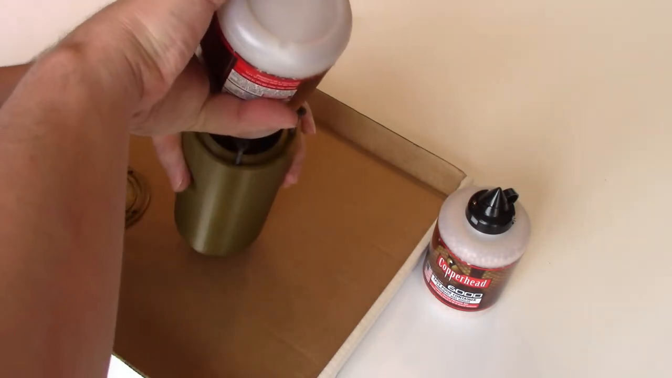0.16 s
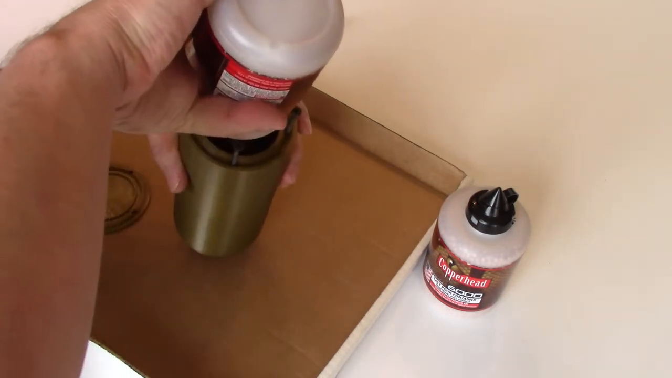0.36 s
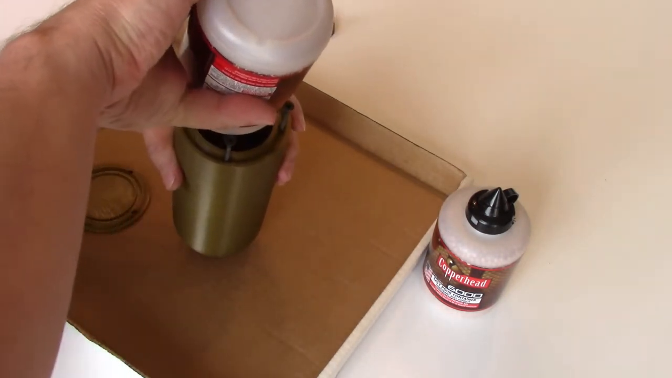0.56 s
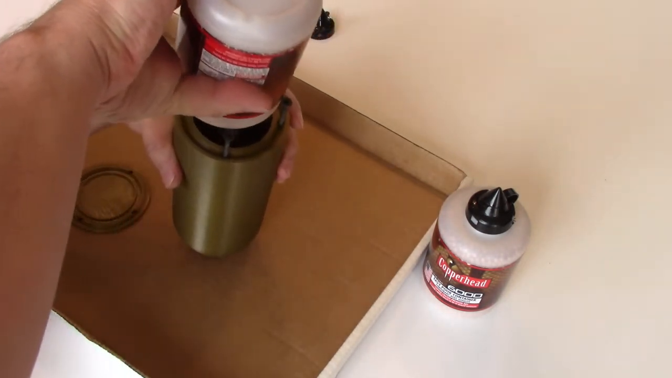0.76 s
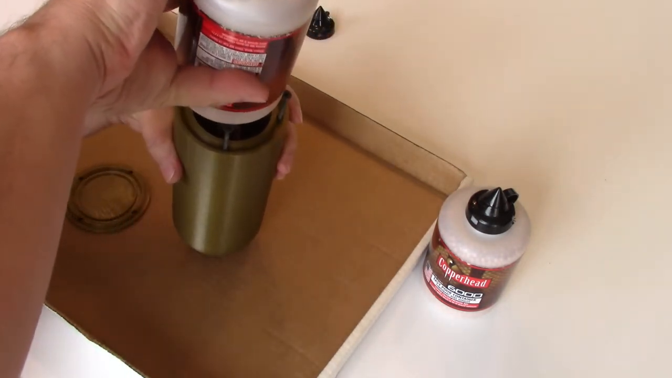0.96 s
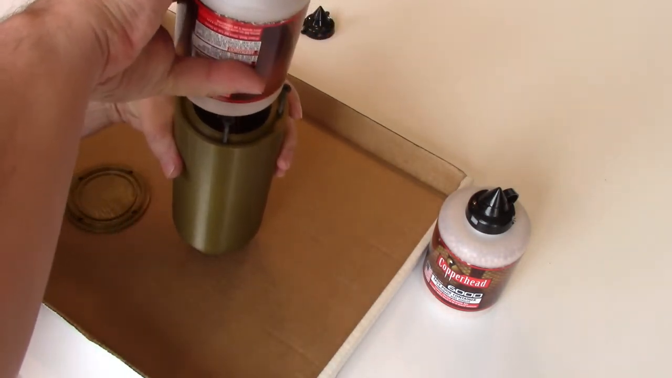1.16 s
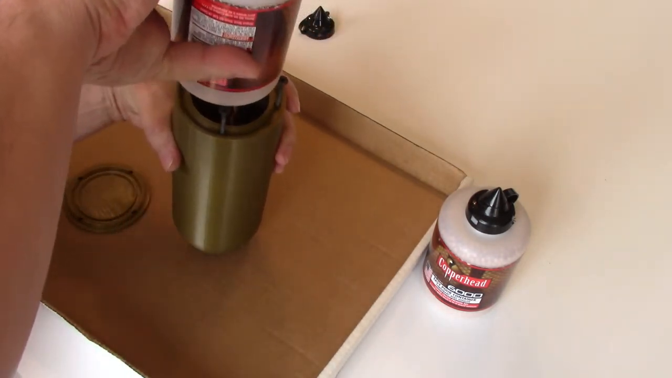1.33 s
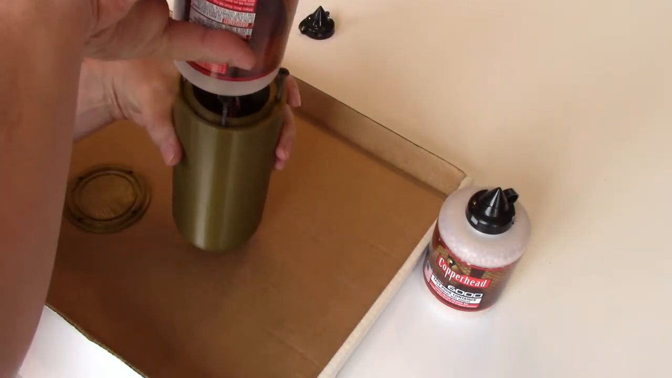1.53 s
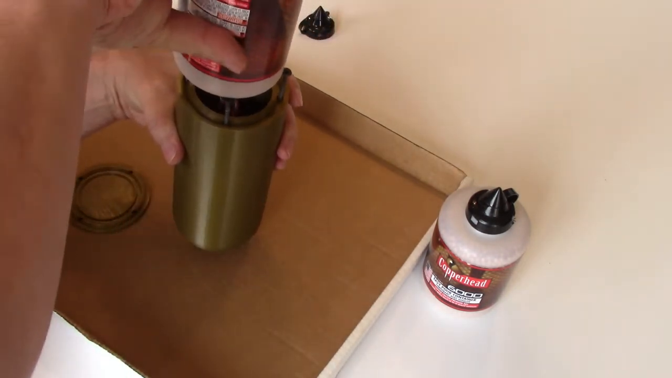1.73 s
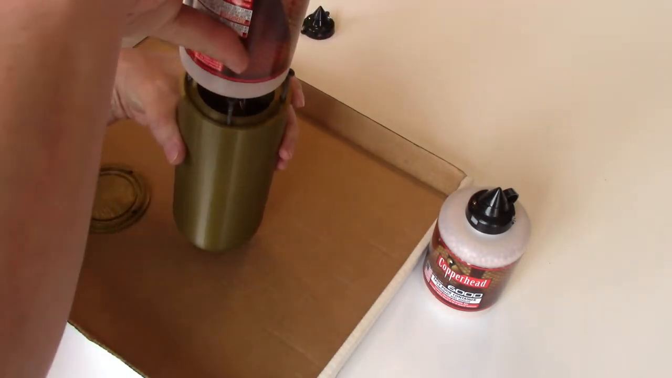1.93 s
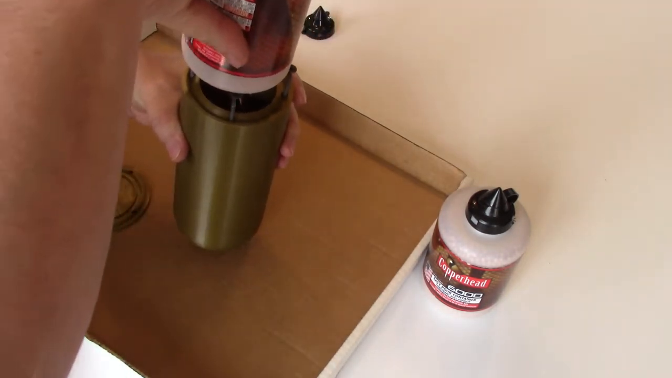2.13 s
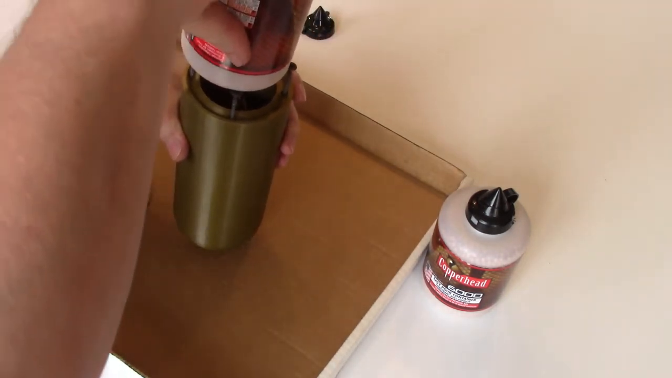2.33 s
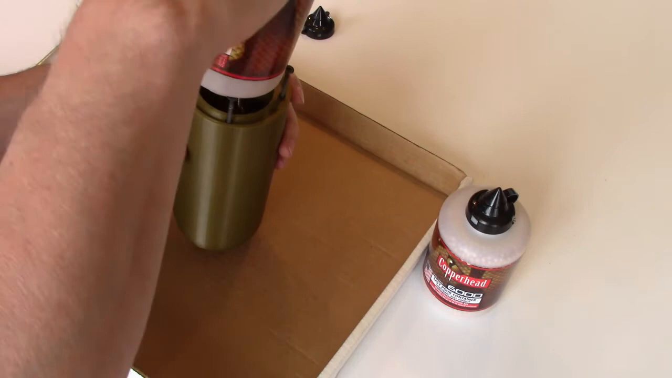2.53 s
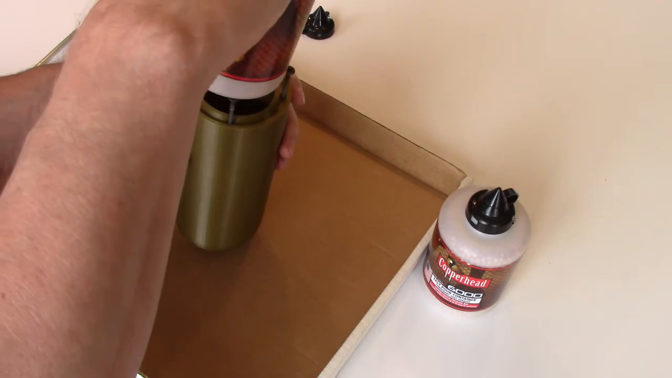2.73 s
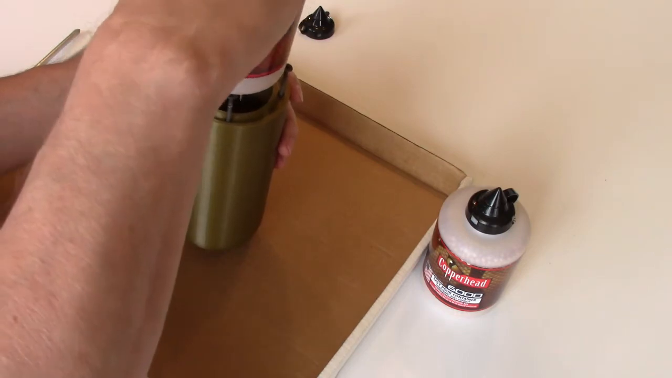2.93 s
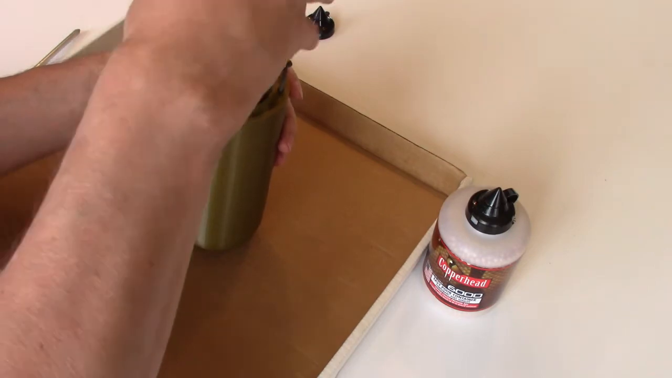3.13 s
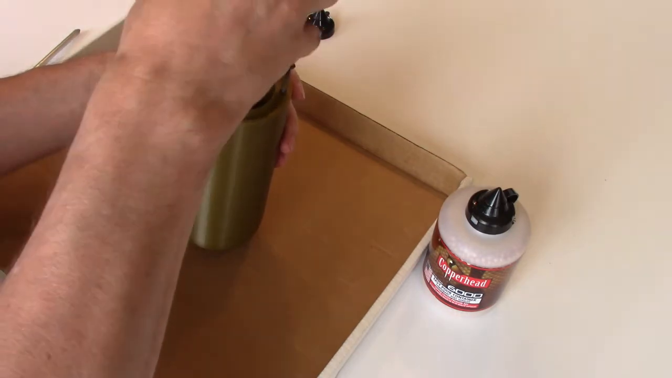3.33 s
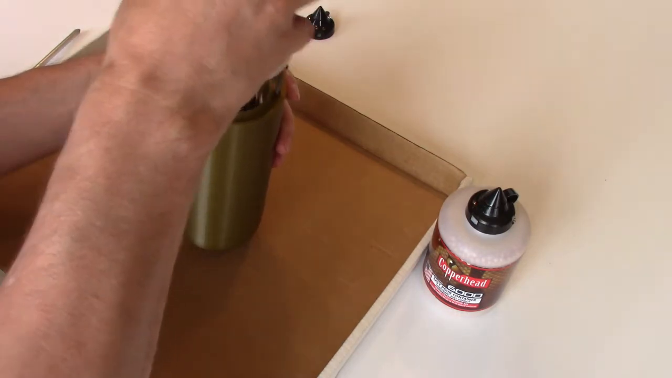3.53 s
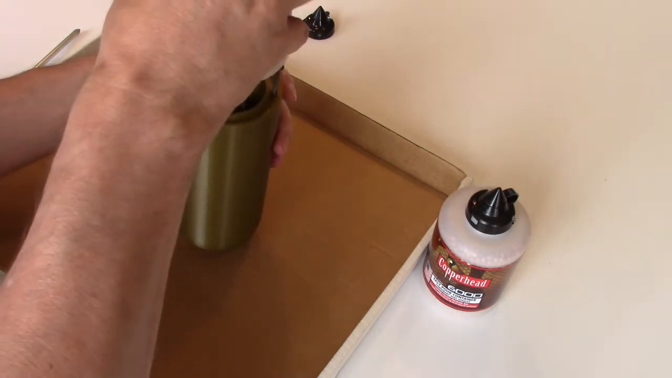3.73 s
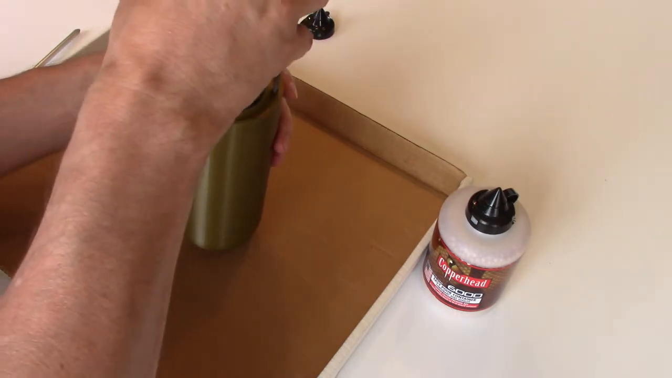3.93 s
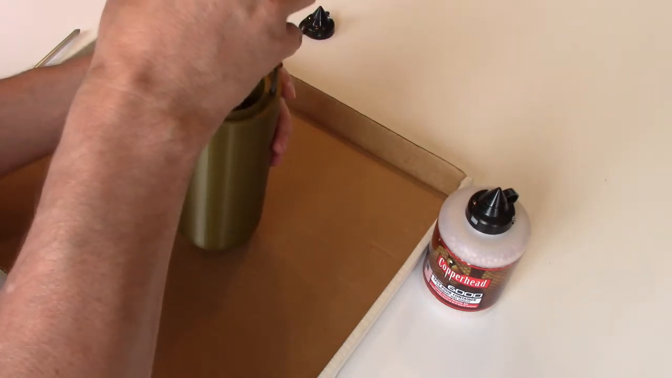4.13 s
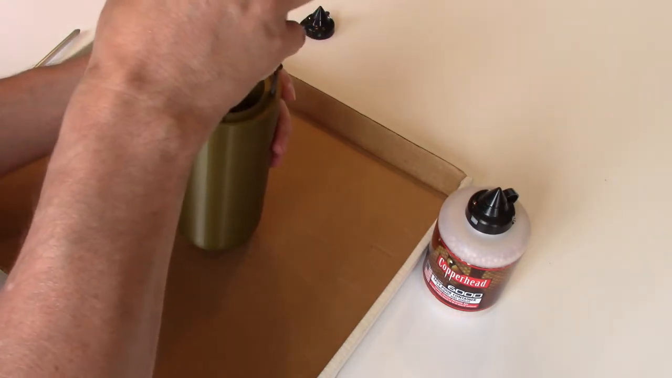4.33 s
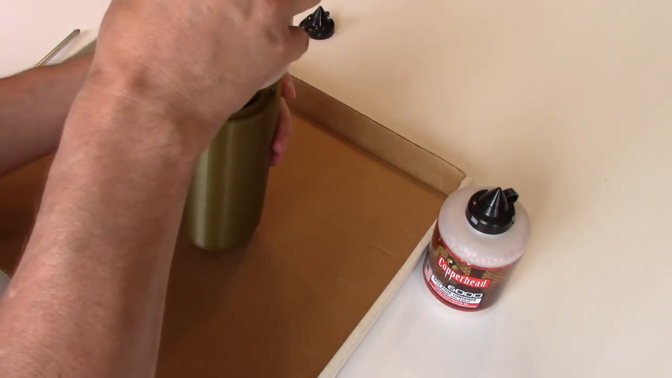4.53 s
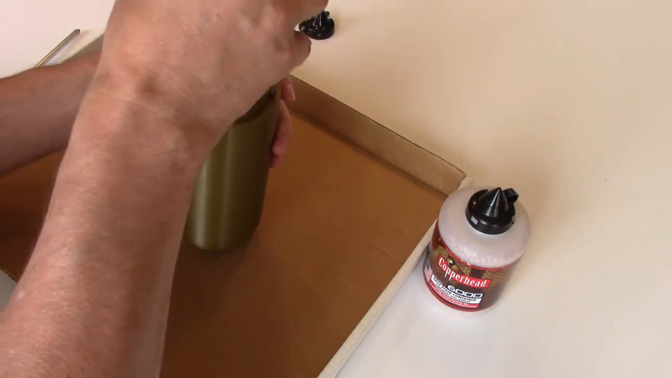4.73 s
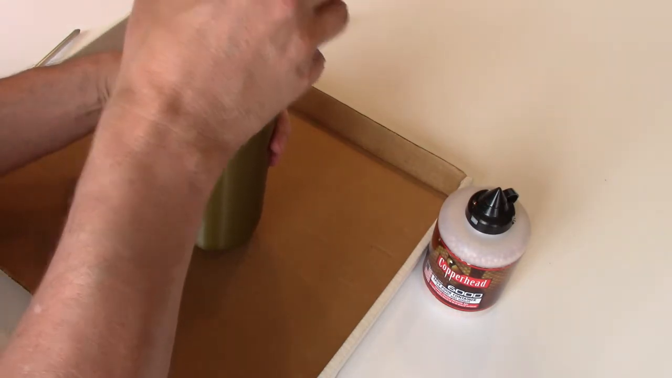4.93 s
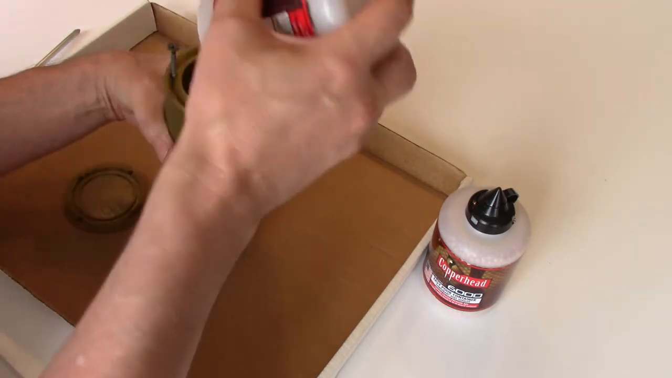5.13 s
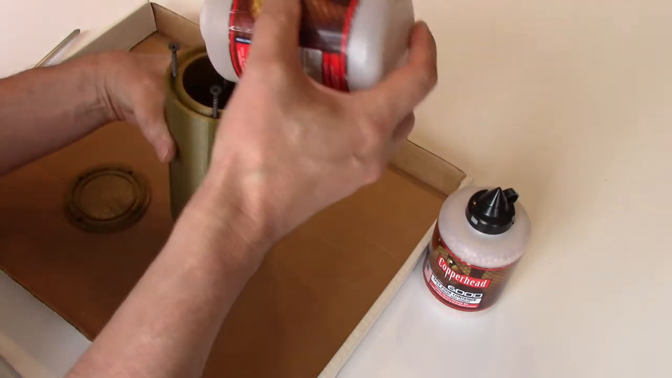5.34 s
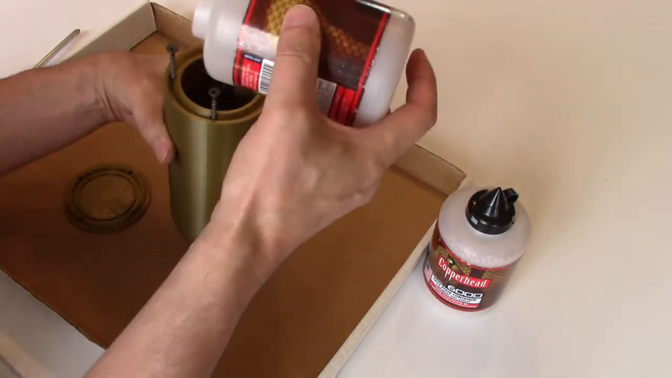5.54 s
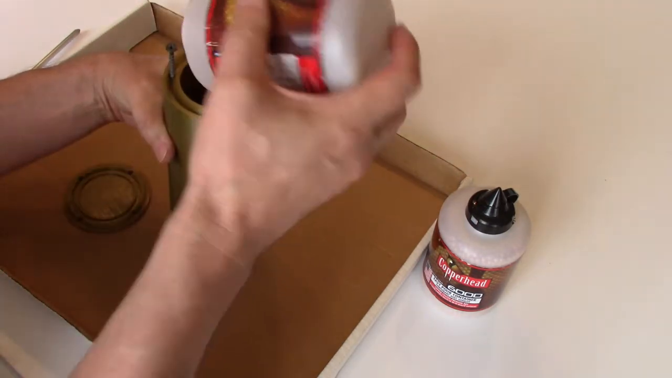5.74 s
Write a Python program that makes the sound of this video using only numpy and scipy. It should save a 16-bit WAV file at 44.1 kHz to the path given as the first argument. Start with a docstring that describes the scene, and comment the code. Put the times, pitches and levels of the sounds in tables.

```python
"""Steel pellets pour from a plastic bottle into a hollow shell, in a quiet room with mains hum.
First comes a dense rattle of tiny noise bursts, with single strikes on top: ring, noise and steel tick.
As the stream thins the bottle is shaken: loads of pellets slide along its wall and knock its hollow body.
Then the last pellets scrape and roll in the tilted bottle, until one more load slides and knocks.
The highest peaks are rounded off throughout."""
import sys
import numpy as np
from scipy import signal
from scipy.fft import rfft, irfft, next_fast_len
from scipy.io import wavfile
from scipy.ndimage import map_coordinates

SR = 44100
rng = np.random.default_rng(int(sys.argv[2]) if len(sys.argv) > 2 else 0)


def generate_wav(signal):
    """Clip the signal to [-1, 1] and save it as 16-bit WAV at the path in sys.argv[1]."""
    frames = np.transpose(np.atleast_2d(signal))
    scaled = np.clip(frames, -1, 1) * 32767
    pcm = np.round(scaled).astype(np.int16)
    wavfile.write(sys.argv[1], SR, pcm)


N = 259749


def amp(db):
    """dB to gain."""
    return 10 ** (np.asarray(db) / 20)


def unit(x):
    """x at rms 1."""
    return x / np.sqrt(np.mean(x ** 2) + 1e-20)


def along(points, hz):
    """(Hz, value) points read off on a log frequency axis."""
    point_hz, value = np.transpose(points)
    return np.interp(np.log(hz + 1), np.log(point_hz + 1), value)


def curves(rows):
    """One value per sample for each column after the time."""
    s, *columns = np.transpose(rows)
    return [np.interp(np.arange(N) / SR, s, column) for column in columns]


def wobble(rate):
    """A smooth random curve, rate knots a second."""
    knots = rng.standard_normal(int(N * rate / SR) + 4)
    return map_coordinates(knots, [np.arange(N) * rate / SR])


def filtered(x, response):
    """x times a complex response of frequency."""
    size = next_fast_len(N + SR // 2)
    return irfft(rfft(x, size) * response(np.fft.rfftfreq(size, 1 / SR)), size)[:N]


def coloured(x, spectrum):
    """x through a minimum-phase filter with the given spectrum and unit energy."""
    size = 4096
    level_db = np.maximum(along(spectrum, np.fft.rfftfreq(size, 1 / SR)), -70)
    # folding the cepstrum forward makes the filter causal
    cepstrum = irfft(np.log(amp(level_db)))
    cepstrum[1:size // 2] *= 2
    cepstrum[size // 2 + 1:] = 0
    impulse = irfft(np.exp(rfft(cepstrum)))
    return signal.fftconvolve(x, impulse / np.linalg.norm(impulse))[:N]


def modes(table):
    """Causal response of a set of resonances, with alternating signs."""
    def response(f):
        total = 0
        for k, (pitch, width, db) in enumerate(table):
            resonance = 1j * f * width / (pitch * pitch - f * f + 1j * f * width)
            total = total + (-1) ** k * amp(db) * resonance
        return total
    return response


def placed(seconds, shapes):
    """Each row of shapes added at its time."""
    at = np.round(seconds * SR).astype(int)[:, None] + np.arange(shapes.shape[1])
    return np.bincount(at.ravel(), shapes.ravel(), N + SR)[:N]


def contacts(rate, spread_db, t60):
    """Random short noise bursts, rate a second, most small and a few larger, rms 1."""
    draw = rng.random((int(rate * N / SR), 2))
    t = np.arange(128) / SR
    size = amp(-spread_db * np.log(1 - .98 * draw[:, 1:]))
    bursts = size * amp(-60 * t / t60) * rng.standard_normal((len(draw), len(t)))
    return unit(placed(draw[:, 0] * N / SR, bursts))


# room noise colour: pitch_hz [Hz], level_db [dB per Hz, relative]
AIR = [(12, -56.5), (20, 14), (80, -5), (223, -14.5), (387, -14), (497, -16.5), (774, -16), (914, -40),
       (5380, -77), (7720, -66), (15000, -62)]


def room_noise():
    """Steady noise shaped to the colour of a quiet room."""
    return amp(-40.5) * unit(coloured(rng.standard_normal(N), AIR))


MAINS_HZ = 60
# mains hum partials: multiple [of the mains], level_db [dB rms before wavering], waver_db [dB]
HUM = [(.5, -70, 10), (1, -32.5, 1.5), (3, -58, 3.5)]


def mains_hum():
    """Sines at multiples of the mains, each wavering slowly in level."""
    t = np.arange(N) / SR
    hum = 0
    for multiple, db, waver_db in HUM:
        level = amp(db + waver_db * wobble(4.17)) * np.sqrt(2)
        hum = hum + level * np.sin(2 * np.pi * multiple * MAINS_HZ * t)
    return hum


RUMBLE_DB, RUMBLE_SWELL_S = -46.5, 0.24
# the shell is gripped and the rumble swells: peak_s [s], level_db [dB]
GRIPS = [(3.56, -38), (4.56, -40)]


def table_rumble():
    """Noise through one low, broad resonance of the table, swelling with each grip."""
    t = np.arange(N) / SR
    level = amp(RUMBLE_DB + 6 * wobble(2.66))
    for s, db in GRIPS:
        level = level + amp(db) * np.exp(-((t - s) / RUMBLE_SWELL_S) ** 2)
    return level * unit(filtered(rng.standard_normal(N), modes([(73.4, 32, 0)])))


# decay of the room: pitch_hz [Hz], t60_s [s]
ROOM = [(300, 0.85), (3000, 0.14), (12000, 0.2)]


def room(x):
    """Each frequency of the room's answer dies at its own speed; a new tail every third of a second."""
    out, step = np.zeros(N + 2 * SR), SR // 3
    for a in range(0, N, step):
        hz, t, z = signal.stft(rng.standard_normal(SR // 2), SR, nperseg=256)
        decay = amp(-60 * t / along(ROOM, hz)[:, None])
        tail = signal.istft(z * decay, SR, nperseg=256)[1]
        wet = signal.fftconvolve(x[a:a + step], tail / np.linalg.norm(tail))
        out[a + 100:][:len(wet)] += wet  # the answer starts 100 samples late
    return out[:N]


# last pellets in the tilted bottle:
# time_s [s], level_db [dB before unevenness], free_share [0-1 rolling freely, the rest scraping]
ROLL = [(4.74, -37.5, .5), (4.8, -52, 0.68), (5.0, -45.5, 0.089), (5.11, -35.5, 0.14), (5.24, -45.5, 0.69),
        (5.33, -40, 0.86), (5.56, -26.5, 1), (5.69, -36.5, .9), (5.83, -29, 0.86)]
# the rolling pellets are jolted: start_s [s], level_db [dB before unevenness]
JOLTS = [(4.873, -40.5), (4.951, -36.5), (5.255, -32.5), (5.385, -34), (5.455, -31), (5.711, -28.5)]
JOLT_T60_S = 0.28
# colour of a few pellets scraping: pitch_hz [Hz], level_db [dB per Hz, relative]
SCRAPE = [(250, -47), (355, 2), (480, -45), (814, -4), (1150, -23), (1750, 1.5), (2350, -14), (2900, -14.5),
          (3400, -16), (3900, -12), (5400, -14.5), (7200, -24.5), (15000, -38)]
# colour of many pellets rolling: pitch_hz [Hz], level_db [dB per Hz, relative]
ROLLING = [(300, -14), (800, -25), (1200, -8), (2300, -12), (2800, 0), (3200, -1), (3500, -10), (3900, -5),
           (4400, -11.5), (4800, -5.5), (5800, -9), (7000, -10.5), (7800, -23), (15000, -38.5)]


def rolling():
    """Small contacts that mix rolling and scraping, turn mostly to scraping, then to free rolling."""
    db, share = curves([(4.7, -80, 0)] + list(ROLL) + [(5.87, -80, 1)])
    share, t = np.clip(share, 0, 1), np.arange(N) / SR
    jolts = sum((t > s) * amp(level - 60 * np.abs(t - s) / JOLT_T60_S) for s, level in JOLTS)
    uneven = np.hypot(amp(db), jolts) * amp(wobble(36))
    grains = contacts(3000, 2.7, 0.0042) + amp(-8) * contacts(120, 3.7, 0.0017)
    soft = uneven * unit(grains)
    scraping = np.sqrt(1 - share) * coloured(soft, SCRAPE)
    return scraping + np.sqrt(share) * coloured(soft, ROLLING)


# dull pellet hits on the wall: start_s [s], level_db [dB before the attack], pitch_hz [Hz], t60_s [s]
PINGS = [(2.9033, -18, 1681, 0.26), (3.0588, -17.5, 1674, 0.066), (3.3336, -21.5, 1720, 0.072),
         (3.6401, -8.5, 1760, 0.03), (4.282, -9, 1794, 0.025), (4.464, -8, 1250, 0.018)]


def pings():
    """One damped wall mode per hit, roughened by the pellets lying on it."""
    s, db, hz, t60 = np.transpose(PINGS)[:, :, None]
    t = np.arange(SR // 8) / SR
    phase_drift = np.cumsum(rng.normal(0, 0.083, (len(s), len(t))), axis=1)
    envelope = amp(db - 60 * t / t60) * (1 - np.exp(-t / 0.001))
    return placed(s[:, 0], envelope * np.sin(2 * np.pi * hz * t + phase_drift))


# bottle resonances, three of air then three overtones: pitch_hz [Hz], width_hz [Hz], level_db [dB, relative]
HOLLOW = [(349.2, 18.3, 0.5), (286.2, 12.6, -10.5), (245, 19, -14), (564, 22, -11), (820, 51, -2.5),
          (1730, 51, -2.5)]
# pellet loads knocking the bottle wall:
# start_s [s], level_db [dB before make-up gain], overtone_db [dB over level_db, before make-up gain]
KNOCKS = [(1.531, -27, -13), (1.671, -25.5, -28), (2.284, -36, -17), (3.041, -31.5, 3), (3.107, -20, -10),
          (3.208, -31, -16), (3.417, -14.5, -1.5), (3.492, -24, 3), (3.553, -16, -6), (3.934, -26, -8),
          (4.068, -26, 6), (4.113, -21.5, 4.5), (4.146, -17, -2), (4.248, -28, -5), (4.298, -24, -7),
          (4.427, -18.5, 0), (4.537, -17.5, -5), (4.59, -12.5, -5.5), (4.698, -13.5, -11),
          (4.772, -32, -28), (4.874, -17, -14), (5.85, -6, -42)]


def knocks():
    """A push rings the air modes; the load goes on landing raggedly, so no two knocks are alike."""
    s, db, overtone_db = np.transpose(KNOCKS)[:, :, None]
    t = np.arange(4096) / SR
    envelope = amp(-60 * t / 0.059) * (1 - np.exp(-t / 0.0025))
    ragged = envelope * rng.standard_normal((len(s), len(t)))
    push = placed(s[:, 0], amp(db + 52) * np.hanning(60) / 30)
    landing = placed(s[:, 0], amp(db + 15.5) * ragged)
    edge = placed(s[:, 0], amp(db + overtone_db + 25.5) * ragged)
    return filtered(push + landing, modes(HOLLOW[:3])) + filtered(edge, modes(HOLLOW[3:]))


# a shake sends a load of pellets along the bottle wall:
# start_s [s], swell_s [s], hold_s [s], level_db [dB before bunching], fade [dB per s],
# sparkle_db [dB over level_db]
SURGES = [(2.897, .005, .03, -24.5, 200, -24), (3.211, .01, 0.028, -23.5, 155, -19),
          (3.405, 0.022, 0.15, -13.5, 146, -18.5), (4.032, 0.017, 0.062, -18.5, 150, -22),
          (4.085, 0.042, .045, -16.5, 195, -24), (4.256, 0.023, .01, -19.5, 126, -12.5),
          (4.385, .09, 0.0089, -20.5, 270, -23), (4.519, .02, 0.016, -20, 250, -30),
          (4.573, 0.0072, 0.021, -20.5, 200, -32), (4.686, .01, 0.015, -28.5, 205, -31),
          (5.837, 0.023, .05, -13.5, 150, -17)]
SWELL_DB = 12  # a load starts this far under its level


def surges():
    """Gain of the sliding loads and of their sparkle: swell, hold, fade."""
    start, swell, hold, db, fade, sparkle_db = np.transpose(SURGES)[:, :, None]
    t = np.arange(N) / SR - start
    swell_db = -SWELL_DB * np.clip(1 - t / swell, 0, 1)
    fade_db = -fade * np.maximum(t - swell - hold, 0)
    gain = (t > 0) * amp(db + swell_db + fade_db)
    return np.linalg.norm(gain, axis=0), np.linalg.norm(gain * amp(sparkle_db), axis=0)


# the stream leaving the bottle:
# time_s [s], level_db [dB before bunching], slide_share [0-1 sliding in the bottle]
STREAM = [(0, -16.5, 0.02), (.49, -16, .05), (.55, -20.5, 0.1), (.6, -14.5, 0), (.75, -18.5, 0),
          (.86, -19, 0.14), (.94, -24, 0.5), (1.08, -17.5, .15), (1.6, -18, 0.03), (2.0, -21, 0.12),
          (2.3, -24.5, 0.48), (2.6, -23.5, 0), (2.67, -31, 0.16), (2.74, -22.5, 0.14), (2.8, -26, 0.9),
          (3.08, -26.5, 0.2), (3.3, -29.5, 0.5), (3.38, -37.5, 0.4), (3.6, -16, 0.07), (3.84, -24.5, 0.23),
          (4.02, -35.5, .6), (4.8, -52, .5)]


def stream():
    """Level (dB) and sliding share of the stream; it has run dry soon after its last point."""
    db, share = curves(list(STREAM) + [(4.86, -80, .5)])
    return db, np.clip(share, 0, 1)


# further strikes at random moments: how many a second, level over the stream and its scatter
FURTHER_PER_S, FURTHER_DB, FURTHER_SPREAD_DB = 40, 11.5, 0.5
# their centre pitch, its scatter (natural log units) and their mean sparkle
FURTHER_HZ, FURTHER_HZ_SPREAD, FURTHER_SPARKLE_DB = 4160, 0.16, -18.5


def further_strikes():
    """Rows like those of STRIKES, at random moments, their level following the stream."""
    count = int(FURTHER_PER_S * N / SR)
    s, draw = rng.random(count) * (N - 1) / SR, rng.standard_normal((count, 3))
    db = stream()[0][(s * SR).astype(int)] + FURTHER_DB + FURTHER_SPREAD_DB * draw[:, 0]
    hz = FURTHER_HZ * np.exp(FURTHER_HZ_SPREAD * draw[:, 1])
    return np.c_[s, db, hz, FURTHER_SPARKLE_DB + 5 * draw[:, 2]]


# single pellet strikes at set moments, loud and soft:
# start_s [s], level_db [dB before layer trims], pitch_hz [Hz], sparkle_db [dB over level_db, before trim]
STRIKES = [(0.0324, 1.5, 4860, -12), (0.093, -7.5, 4720, -17), (0.1231, -5, 3980, -18),
           (0.156, -7, 4700, -12), (0.189, 0, 3960, -15), (0.2048, 0, 4590, -9), (0.2415, -4, 4000, -12),
           (0.2717, 1, 3170, -15), (0.3366, -1, 3600, -14), (0.407, -1, 3100, -10), (0.43, 0, 5470, -12),
           (0.4452, 0, 4040, -12), (0.4747, 0.5, 4300, -12), (0.552, -12, 3870, -12),
           (0.5604, 1, 4270, -12), (0.5908, -1, 3280, -5), (0.6516, 1, 6400, -8), (0.7087, -4, 3400, -15),
           (0.7714, 0, 2950, -16), (0.797, 1.5, 3940, -12), (0.815, -3, 5300, -12), (0.852, 2, 4400, -11),
           (0.904, -6, 3030, -10), (1.018, 1.5, 6480, -10), (1.0274, 0.5, 3900, -7),
           (1.0719, -10, 4920, -19), (1.186, 2, 3860, -12), (1.2216, -1.5, 5500, -18),
           (1.2457, -2, 3870, -19), (1.281, -1, 4800, -12), (1.308, 3, 3670, -9), (1.3222, -3.5, 4640, -12),
           (1.3804, -4.5, 2890, -20), (1.4112, -11, 3900, -20), (1.4301, 2.5, 3960, -9),
           (1.4357, -0.5, 3920, -14), (1.4697, -4, 3750, -18), (1.4781, 2, 4040, -16),
           (1.496, -1, 3960, -17), (1.5515, 0, 3700, -13), (1.6513, 0, 3850, -9), (1.72, -4, 3730, -9),
           (1.7292, -1, 4050, -8), (1.7659, -4.5, 4600, -14), (1.7881, -0.5, 4000, -12),
           (1.8055, 0, 4020, -9), (1.8467, -5, 4000, -10), (1.9062, -8, 3930, -10),
           (1.9362, -5.5, 5640, -12), (1.9524, -8, 4010, -7), (1.9606, -1.5, 4000, -12),
           (1.9888, 1, 3560, -5), (2.0046, 2, 3920, -10), (2.0233, 2, 3880, -11), (2.0513, 2, 4030, -11),
           (2.0645, -5, 4040, -12), (2.0915, -3.5, 3900, -6), (2.1343, -1, 4970, -13),
           (2.1405, -5.5, 3960, -10), (2.1688, -2.5, 3800, -7.5), (2.2026, -4, 4240, -8),
           (2.211, 1, 3920, -9), (2.23, -3, 4740, -12), (2.2507, -5, 3910, -12), (2.2778, 3, 3980, -6.5),
           (2.2854, -3, 4770, -14), (2.3242, -12, 3550, -10), (2.3374, -6.5, 4190, -12),
           (2.3775, 1, 4100, -9), (2.3844, 0.5, 5820, -6), (2.4165, 0, 3730, -8), (2.4583, -3, 4070, -11),
           (2.486, -3, 4900, -11), (2.518, -8.5, 3950, -8), (2.5304, -2, 5700, -13), (2.5675, 2, 3950, -13),
           (2.5772, -4, 4760, -8), (2.6036, -1.5, 4000, -11), (2.6154, -1, 4080, -15),
           (2.622, -5, 4030, -15), (2.688, 1, 5900, -8), (2.7264, 2, 3970, -4), (2.8304, -5, 4530, -14),
           (2.8371, -3.5, 3400, -10), (2.8903, 2.5, 4160, -14), (2.9047, -3, 4760, -12),
           (2.9632, -7, 3600, -12), (2.9813, -2.5, 3930, -14), (3, -5.5, 3590, -14),
           (3.0054, -2.5, 4200, -10), (3.0195, -2, 3290, -17), (3.04, 0, 6050, -13),
           (3.0566, -5, 4850, -16), (3.1025, -1.5, 4600, -11), (3.129, -5.5, 4170, -12),
           (3.2117, -5, 3930, -12), (3.2177, 1.5, 4130, -12), (3.2268, 0.5, 4060, -6),
           (3.242, 1.5, 3660, -10), (3.329, -15.5, 3230, -12), (3.4204, 1.5, 5820, -8),
           (3.5467, 1, 3800, -7), (3.601, -9, 5750, -5), (3.658, 2.5, 3840, -6.5), (3.6748, -3.5, 6200, -1),
           (3.7259, -1, 4220, -6), (3.7881, -4, 4160, -9), (3.8134, -7, 6170, -12), (3.8389, -1, 4630, -8),
           (3.8968, -5.5, 5930, -12), (3.953, -9, 4240, -23), (4.043, -4, 4860, -24),
           (4.0551, 3, 4270, -17), (4.0744, -7, 4680, -12), (4.1187, -2, 5350, -16),
           (4.1289, -8, 5350, -16), (4.1468, -1, 5300, -10), (4.2753, -6, 5100, -7), (4.3053, -3, 5500, -7),
           (4.416, -11, 5830, -9), (4.4685, -3, 5900, -17), (4.489, -8, 3600, -23),
           (4.5444, -5.5, 4200, -18), (4.5866, -4, 5450, -22), (5.8495, -6, 3880, -12)]
# colour of pellets on pellets in the shell: pitch_hz [Hz], level_db [dB per Hz, relative]
HEAP = [(150, -33), (330, -21), (505, -25.5), (950, -26.5), (1550, -25), (1760, -5.5), (2080, -4.5),
        (2650, -8), (3050, -3), (3950, -0.5), (4400, -1.5), (6400, -3), (7600, -11.5), (10000, -66),
        (15000, -50)]
# air at the shell mouth: pitch_hz [Hz], width_hz [Hz], level_db [dB, relative]
MOUTH = [(1741, 31, 0)]
# colour of steel contact: pitch_hz [Hz], level_db [dB per Hz, relative]
SPARKLE = [(5000, -20.5), (7500, -1), (8500, -0.5), (11000, -4), (14000, -12), (15700, -27)]


def strikes():
    """Each strike: a few cycles at its own pitch, a burst of heap noise and a steel tick."""
    s, db, hz, sparkle_db = np.vstack([STRIKES, further_strikes()]).T[:, :, None]
    t = np.arange(640) / SR
    noise = rng.standard_normal((len(s), 2, len(t)))
    rise = 1 - np.exp(-t / 0.00011)
    ring = amp(db - 2.5 - 60 * t / 0.0092) * rise * np.sin(2 * np.pi * hz * t)
    burst = amp(db - 8 - 60 * t / 0.018) * rise * noise[:, 0]
    tick = amp(db + sparkle_db - 8.5 - 60 * t / 0.015) * rise * noise[:, 1]
    bursts = placed(s[:, 0], burst)
    mouth = amp(6) * filtered(bursts, modes(MOUTH))  # the air at the shell mouth answers
    ticks = coloured(placed(s[:, 0], tick), SPARKLE)
    return placed(s[:, 0], ring) + coloured(bursts, HEAP) + mouth + ticks


# colour of pellets sliding on the thin bottle wall: pitch_hz [Hz], level_db [dB per Hz, relative]
SLIDE = [(300, -60), (1150, -18), (1750, -4.5), (2400, -11), (2950, -0.5), (3450, -14), (3920, -0.5),
         (4500, -4), (5500, 3), (5900, -0.5), (6600, -2.5), (7400, -26.5), (9500, -38), (15000, -45)]
STREAM_SPARKLE_DB = -14  # over the stream


def rattle():
    """The stream rattles on the heap; pellets still in the bottle ring its wall and air instead."""
    db, share = stream()
    load, load_sparkle = surges()
    clumps = amp(1.65 * wobble(50) + 1.55 * wobble(12))  # pellets come in small bunches
    falling = contacts(1300, 1.9, 0.0057)
    sliding = contacts(1800, 2.4, 0.0045)
    # the falling contacts plus sparser, sharper ones make the bright sparkle
    bright = unit(falling + contacts(900, 6.8, 0.0018))

    heap = coloured(falling, HEAP) + amp(-15.5) * unit(filtered(falling, modes(MOUTH)))
    air = amp(-18.5) * unit(filtered(sliding, modes(HOLLOW[:3])))
    overtones = amp(-19.5) * unit(filtered(sliding, modes(HOLLOW[3:])))
    wall = coloured(sliding, SLIDE) + air + overtones

    on_heap = np.hypot(amp(db) * np.sqrt(1 - share), amp(-9) * load)
    on_wall = np.hypot(amp(db) * np.sqrt(share), load)
    glint = np.hypot(amp(db + STREAM_SPARKLE_DB), load_sparkle)
    return clumps * (on_heap * heap + on_wall * wall + glint * coloured(bright, SPARKLE))


def scene():
    """Pellets and bottle in the room, over its noise, hum and rumble."""
    background = mains_hum() + table_rumble() + room_noise()
    near = rattle() + rolling() + strikes() + pings() + knocks()
    return (near + amp(-10.0) * room(near) + background)[None]


TOP_HZ = 15730  # band limit


def record(dry):
    """Peaks are rounded off near full scale; nothing stays above the band limit."""
    rounded = dry[0] / (1 + np.abs(dry[0] / 1.03) ** 7) ** (1 / 7)
    return filtered(rounded, lambda hz: hz < TOP_HZ)[None]


dry = scene()
out = record(dry)
generate_wav(out)
```